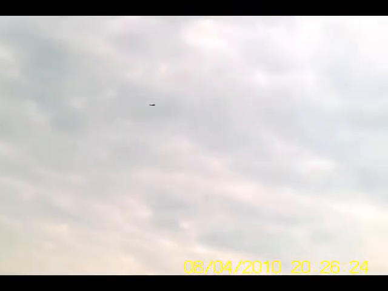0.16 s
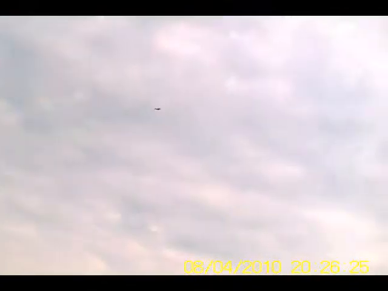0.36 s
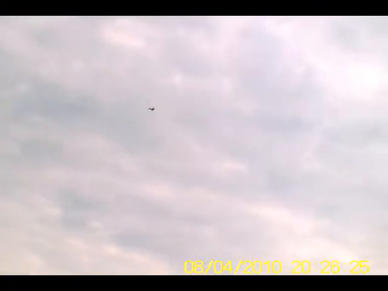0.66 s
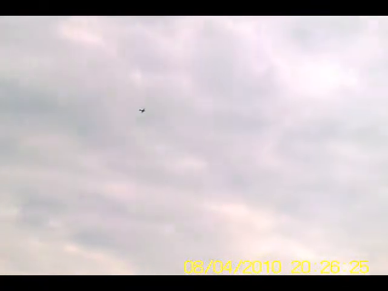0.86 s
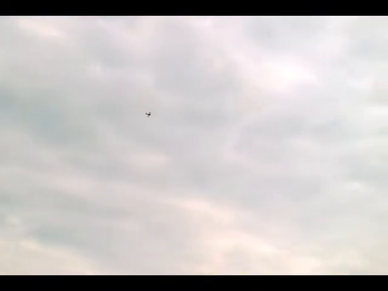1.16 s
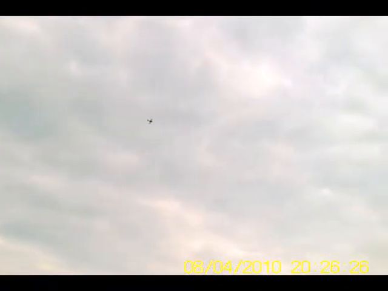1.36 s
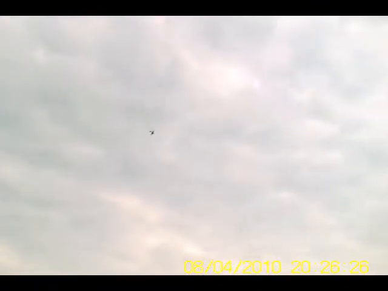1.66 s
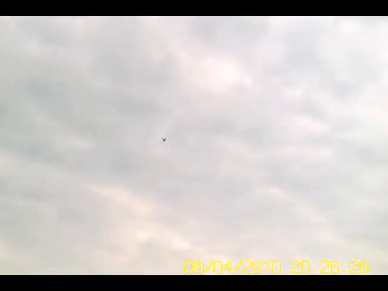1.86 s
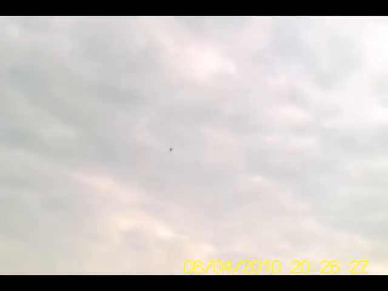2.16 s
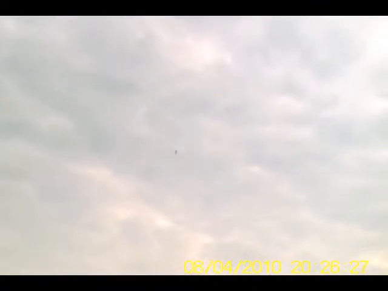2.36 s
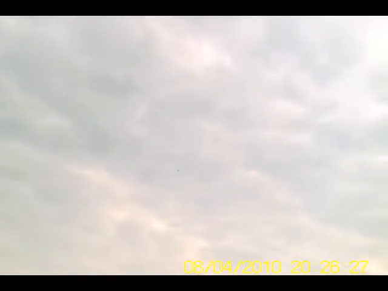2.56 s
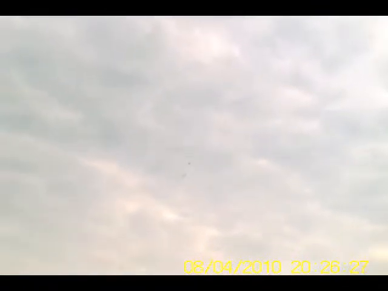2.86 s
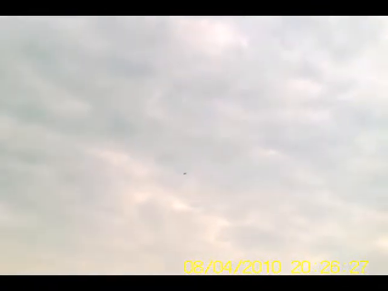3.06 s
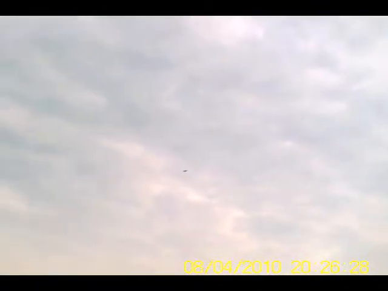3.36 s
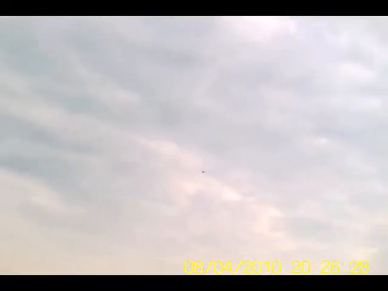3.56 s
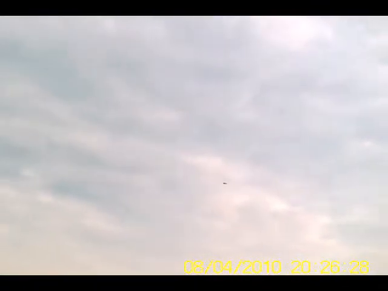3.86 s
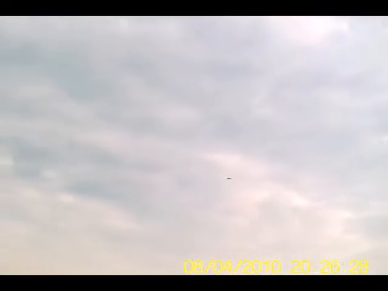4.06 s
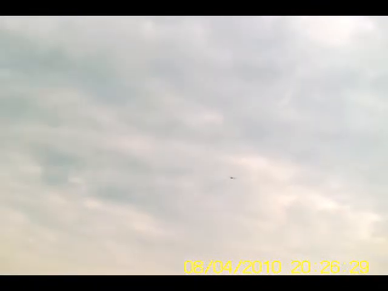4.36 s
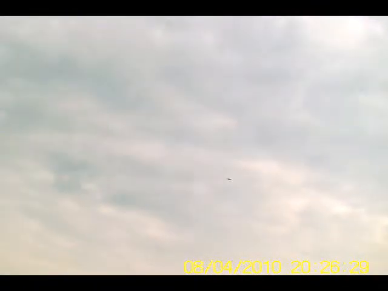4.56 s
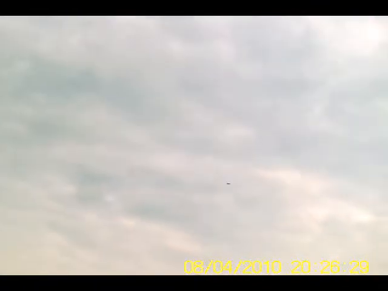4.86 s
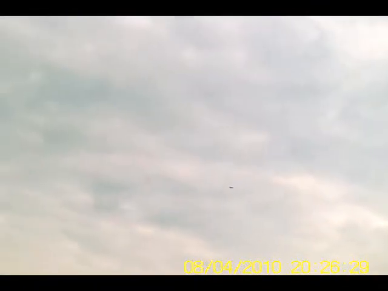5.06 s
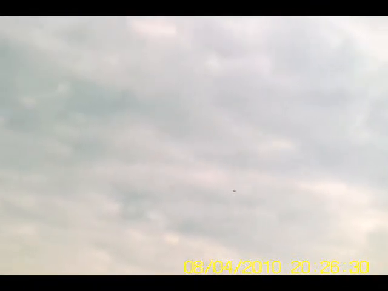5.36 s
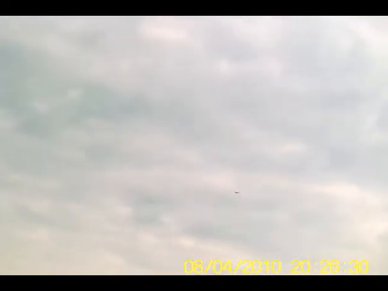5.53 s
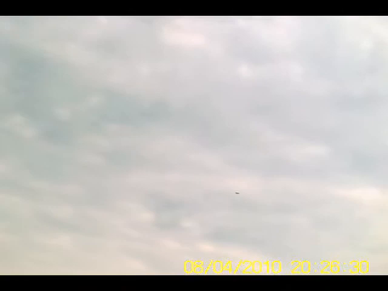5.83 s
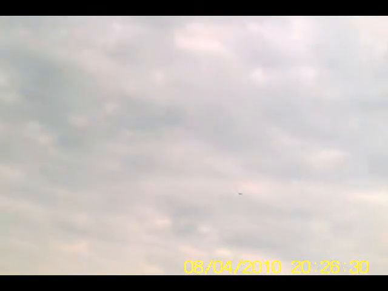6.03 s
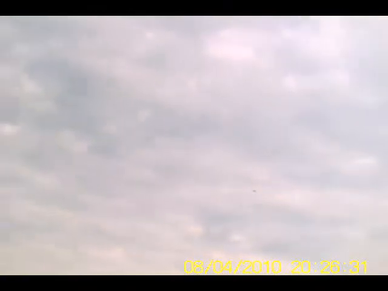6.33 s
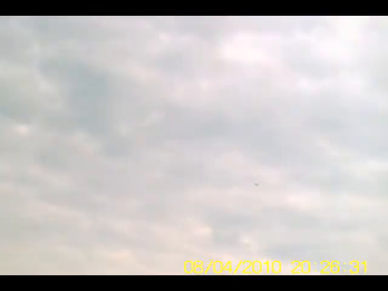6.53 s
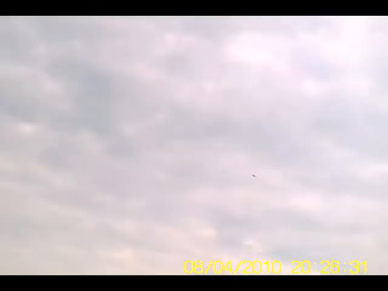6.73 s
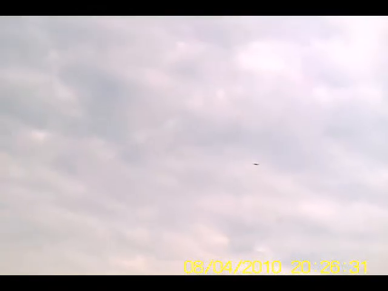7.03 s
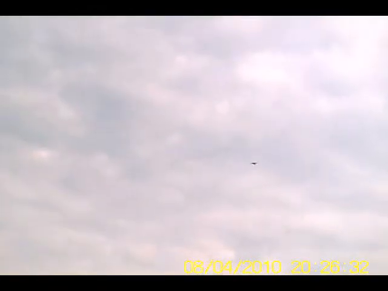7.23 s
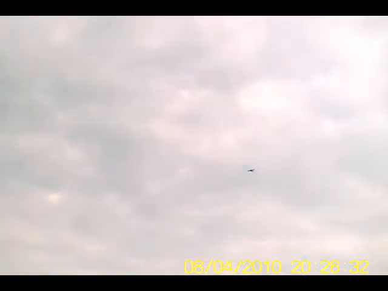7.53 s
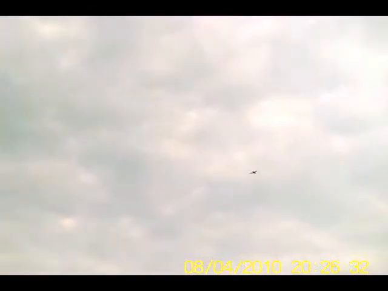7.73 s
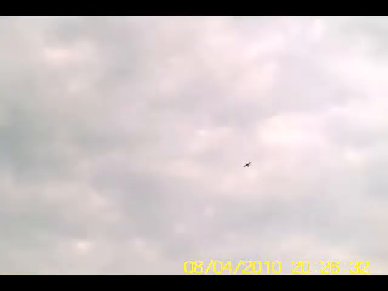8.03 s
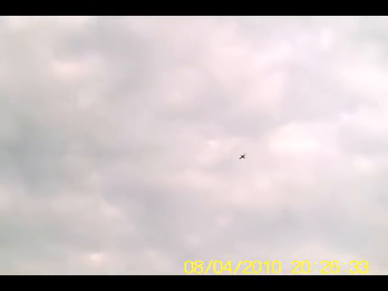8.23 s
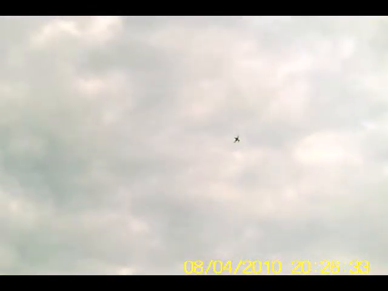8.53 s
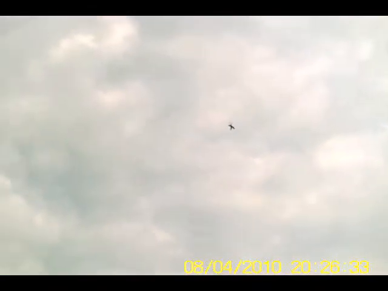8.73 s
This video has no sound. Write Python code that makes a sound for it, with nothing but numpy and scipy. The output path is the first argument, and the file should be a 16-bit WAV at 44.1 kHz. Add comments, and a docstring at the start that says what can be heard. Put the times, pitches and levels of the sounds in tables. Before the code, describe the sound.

Outdoors in a park, heard through a tiny windblown camera microphone. It starts quiet, with a brief low gust, soft far-traffic roar around the middle range, a faint wavering engine drone and a narrow, shrill sizzle high above. Over the first five seconds everything gradually swells. A small electric model plane's thin whine sinks slightly in pitch until about 3 seconds, when it is most noticeable; its low propeller buzz strengthens towards 4.5, then rises in pitch between 5 and 7 as it weakens. Faint chirps and ticks appear, including a softer one near 3.6. At 7 seconds a hard wind push thumps the microphone and the whole scene abruptly drops much quieter. From about 7.5 it climbs again: the higher, steadier propeller buzz returns by 8, with airy wing rush and fluttering, rumbling gusts from 8 to the end at 8.9.

```python
"""A park under a small electric model plane: propeller buzz and motor whine (sines locked to one shaft),
echoed wing rush, far traffic (shaped noise), a far engine's drone, distant chirps and ticks.
Wind rumbles on a tiny camera microphone; its resonance near 5.6 kHz turns air noise into a shrill sizzle.
Camera gain creeps up, swelling all the microphone hears; a hard push of wind near 7 s overloads it
and the gain drops at once, then climbs anew."""
import sys
import numpy as np
from scipy import signal
from scipy.fft import rfft, irfft, next_fast_len
from scipy.io import wavfile
from scipy.ndimage import uniform_filter1d, map_coordinates

SR = 44100
rng = np.random.default_rng(int(sys.argv[2]) if len(sys.argv) > 2 else 0)


def store_wav(level_fs):
    """Save 16-bit WAV to argv[1]."""
    pcm = np.round(np.clip(np.atleast_2d(level_fs), -1, 1) * 32767)
    wavfile.write(sys.argv[1], SR, pcm.T.astype(np.int16))


N = 392137
T = np.arange(N) / SR  # s


def amp(db):
    """Decibels to linear gain."""
    return 10 ** (np.asarray(db) / 20)


def unit(x):
    """Scale x to rms 1."""
    return x / np.sqrt(np.mean(x ** 2) + 1e-20)


def rounded(x):
    """Soft-saturate the highest peaks, at rms 1."""
    return unit(np.tanh(unit(x) / 3))


def curves(rows):
    """Interpolate each column after start_s to one value per sample."""
    start_s, *columns = np.transpose(rows)
    return np.array([np.interp(T, start_s, column) for column in columns])


def bump(centre_s, length_s):
    """Gaussian rise to 1 and fall; length_s is the 1/e half-length."""
    return np.exp(-((T - centre_s) / length_s) ** 2)


def wobble(knots_per_s):
    """Smooth random curve through normally distributed knots."""
    knots = rng.standard_normal(int(N * knots_per_s / SR) + 4)
    return map_coordinates(knots, [T * knots_per_s])


def filtered(x, response):
    """Multiply the spectrum of x by response(Hz)."""
    size = next_fast_len(N + 8192)  # padded against wrap-around
    gain = response(np.fft.rfftfreq(size, 1 / SR))
    return irfft(rfft(x, size) * gain, size)[:N]


def rush(spectrum, patchy_db):
    """Coloured noise of rms 1 whose gain varies in patches of time and frequency."""
    bins = signal.stft(rng.standard_normal(N), nperseg=512)[2]
    field = uniform_filter1d(rng.standard_normal(bins.shape), size=5, axis=0)  # across frequency
    field = uniform_filter1d(field, size=16, axis=1)  # across time
    patchy = bins * amp(patchy_db * unit(field))
    noise = signal.istft(patchy, nperseg=512)[1][:N]
    hz, db = np.transpose(spectrum)
    return unit(filtered(noise, lambda f: amp(np.interp(np.log(f + 1), np.log(hz + 1), db))))


def narrow(centre_hz, half_width_hz):
    """Noise of rms 1 in one resonance-shaped band; half amplitude at half_width_hz."""
    noise = rng.standard_normal(N)
    return unit(filtered(noise, lambda f: 1 / (1 + ((f - centre_hz) / half_width_hz) ** 2)))


# motor and propeller: start_s, shaft_hz, propeller_db, whine_db
FLIGHT = [(0, 267, -71, -59), (2.2, 258, -57, -65), (3, 254.8, -54, -54), (3.6, 257.6, -49.5, -66),
          (4.5, 267.2, -46, -62), (5.3, 273.6, -52.5, -64), (5.7, 307.7, -54, -85),
          (6.8, 324, -62.5, -63.5), (8.1, 324.8, -45, -59.5), (8.89, 316.6, -45, -65)]
WHINE_OCTAVE_DB, TONE_FLICKER_DB = -8.5, 1.5  # octave relative to whine; turbulent fading


def plane():
    """Propeller at shaft rate; seven pole pairs whine at 7 and 14 times it; turbulence flickers each."""
    shaft_hz, propeller_db, whine_db = curves(FLIGHT)
    unsteady_hz = shaft_hz * (1 + 0.00046 * wobble(17))
    angle = 2 * np.pi * np.cumsum(unsteady_hz) / SR
    orders_db = [(1, propeller_db), (7, whine_db), (14, whine_db + WHINE_OCTAVE_DB)]
    return sum(amp(db + TONE_FLICKER_DB * wobble(5.6)) * np.sin(order * angle)
               for order, db in orders_db)


# wing rush and ground echo: start_s, rush_db, echo_lag_s
CIRCUIT = [(0, -67, .0056), (1.5, -70, 0.0036), (4, -71.5, .0033), (6.3, -64, .003), (7.3, -63, 0.0039),
           (8.3, -57, .0046), (8.89, -61, .0053)]


def wings():
    """Wing rush plus delayed ground echo: a comb sweeping up as the lag shrinks, down as it grows."""
    rush_db, echo_lag_s = curves(CIRCUIT)
    air = narrow(3850, 450) + amp(-6.0) * narrow(6540, 330)
    echo = map_coordinates(air, [(T - echo_lag_s) * SR])
    return amp(rush_db) * unit(air + .6 * echo)


# background levels: start_s, traffic_db, air_db
PARK_LEVEL = [(0, -36.5, -41.5), (1.2, -35, -40), (2.2, -36, -40), (3, -37, -42.5), (3.5, -33.8, -43),
              (4.1, -35.5, -43.5), (6.2, -37, -45.5), (7.2, -37.5, -42), (8.2, -36, -38), (8.89, -40, -41)]
# far-traffic spectrum: freq_hz, relative_db
TRAFFIC_SPECTRUM = [(100, -28), (280, -13.5), (450, -7.5), (600, -4.3), (750, -3), (920, 0.5), (1150, -0.2),
                    (1350, -5.5), (1600, -20), (1900, -29.5), (3000, -67)]
# open-air spectrum: freq_hz, relative_db
AIR_SPECTRUM = [(150, -26), (330, -15.5), (450, -9.5), (560, -2), (800, -4.5), (1250, -2), (1550, 1.5),
                (1700, -5.5), (1880, -16), (2050, -20), (2750, -29), (3400, -21), (4400, -29.5),
                (6000, -48)]
# far engine's tones: tone_hz, relative_db
DRONE = [(61.46, 3), (97.2, 0.5), (123.4, -5.5), (387.7, -14), (424.6, -15)]
# far engine's levels either side of the split: start_s, low_tones_db, high_tones_db
DRONE_LEVEL = [(0, -37, -56), (1.5, -39, -44), (2.6, -36.5, -37), (3.8, -36.5, -35.5), (4.2, -43, -40),
               (4.7, -39, -37.5), (6, -42.5, -42), (8.89, -42, -45)]
# hiss band near 2.3 kHz: start_s, level_db
LOW_BAND = [(0, -57), (.9, -55), (2.2, -60.5), (4.6, -58.5), (7, -61), (8.89, -66)]
HIGH_BAND_DB, HIGH_BAND_S, HIGH_BAND_LENGTH_S = -63.5, 4.17, 1.94  # one swell near 3.4 kHz
DRONE_SPLIT_HZ, TRAFFIC_WAVER_DB = 250, .5


def park():
    """Far tyres roar near 1 kHz over an engine's drone, open air and two narrow hiss bands."""
    traffic_db, air_db = curves(PARK_LEVEL)
    low_tones_db, high_tones_db = curves(DRONE_LEVEL)
    low_band_db, = curves(LOW_BAND)
    tyres = amp(traffic_db + TRAFFIC_WAVER_DB * wobble(8)) * rush(TRAFFIC_SPECTRUM, patchy_db=-0.1)
    air = amp(air_db) * rush(AIR_SPECTRUM, patchy_db=0.5)
    drone = 0
    for tone_hz, relative_db in DRONE:
        # the long path through moving air makes each tone fade and drift in phase
        level_db = low_tones_db if tone_hz < DRONE_SPLIT_HZ else high_tones_db
        level = amp(level_db + relative_db + 2.4 * wobble(5.6))
        drone = drone + level * np.sin(2 * np.pi * tone_hz * T + 0.65 * wobble(5))
    low_band = amp(low_band_db) * narrow(2323, 270)
    swell = bump(HIGH_BAND_S, HIGH_BAND_LENGTH_S)
    high_band = amp(HIGH_BAND_DB) * swell * narrow(3356, 100)
    return tyres + air + drone + low_band + high_band


# port resonance: freq_hz, relative_db
SIZZLE_SPECTRUM = [(3000, -47), (4400, -28.5), (4800, -18.5), (5100, -9), (5350, -3), (5580, 0.5),
                   (5780, -3), (6080, -16), (6400, -19), (6850, -21), (7200, -32), (9000, -66)]
# hiss, before and after the gain stage: freq_hz, relative_db
HISS_SPECTRUM = [(500, -7), (2900, 5), (4200, -1.5), (7000, 1), (9600, 0), (10200, -2.5), (10600, -9.5),
                 (11000, -22), (11300, -39)]
SIZZLE_DB, MIC_HISS_DB = -43, -61  # before gain control


def microphone():
    """The port's sharp resonance rings with air noise, above an even hiss."""
    sizzle = amp(SIZZLE_DB + 0.16 * wobble(17)) * rush(SIZZLE_SPECTRUM, patchy_db=0.14)
    return sizzle + amp(MIC_HISS_DB) * rush(HISS_SPECTRUM, patchy_db=1.1)


# gusts and lulls: centre_s, length_s, change_db
GUSTS = [(.2, 0.22, 3.5), (1.5, 0.27, 0.5), (2.6, .4, 1), (4.15, 0.083, -2.5), (4.6, 0.082, 2),
         (5.852, 0.34, -2), (7.35, .2, -6), (8.03, 0.087, 6.5), (8.33, 0.13, 11), (8.54, 0.13, 8),
         (8.85, 0.23, 9)]
# slow heaving of the air: start_s, level_db
SWAY_LEVEL = [(0, -20.5), (1, -31), (4, -30), (6.95, -22), (7.12, -15.5), (8.89, -16)]
# slow-heave spectrum: freq_hz, relative_db
SWAY_SPECTRUM = [(1, -14.5), (4, 0.5), (14, -3.5), (28, -9), (42, -18), (70, -43), (150, -80)]
# large-eddy spectrum: freq_hz, relative_db
RUMBLE_SPECTRUM = [(15, -29.5), (38, -4.5), (58, 1.5), (80, -8), (110, -11), (140, -16.5), (220, -43),
                   (500, -73)]
# small-eddy spectrum: freq_hz, relative_db
FLUTTER_SPECTRUM = [(50, -33), (105, 1.5), (140, 0.5), (185, 0), (240, -7.5), (350, -10), (600, -26.5),
                    (1500, -62)]
RUMBLE_DB, FLUTTER_DB = -30, -42  # between gusts, before gain control
FLUTTER_GUST_RATIO = 1.13  # flutter dB per gust dB
EDDY_DB, FLURRY_DB = 1, 1.2  # flutter's swelling and quick flurries
PUSH_S, PUSH_LENGTH_S, PUSH_DB = 7.008, .03, -8  # hard push, before gain control


def wind():
    """Eddies of three sizes press on the microphone; gusts raise the smallest most; a push displaces all."""
    gust_db = sum(change_db * bump(centre_s, length_s) for centre_s, length_s, change_db in GUSTS)
    sway_db, = curves(SWAY_LEVEL)
    eddies = wobble(16)
    sway = amp(sway_db) * rounded(rush(SWAY_SPECTRUM, patchy_db=1.25))
    large = amp(0.95 * eddies) * rush(RUMBLE_SPECTRUM, patchy_db=0.5)
    rumble = amp(RUMBLE_DB + gust_db) * rounded(large)
    small = amp(EDDY_DB * eddies + FLURRY_DB * wobble(45)) * rush(FLUTTER_SPECTRUM, patchy_db=-0.3)
    flutter = amp(FLUTTER_DB + FLUTTER_GUST_RATIO * gust_db) * unit(small)
    push = bump(PUSH_S, PUSH_LENGTH_S)
    return (sway + rumble + flutter) * (1 - push) + amp(PUSH_DB) * push


# faint chirps and ticks, and one brief swell of the hiss band near 2.3 kHz at 3.58 s: centre_s, centre_hz,
# width_hz, length_s, level_db
CHIRPS = [(.17, 3850, 350, 0.022, -56), (1.53, 3750, 400, .015, -59), (2.457, 3400, 1800, .008, -54),
          (3.581, 2278, 500, 0.16, -53), (4.115, 4225, 450, .039, -64), (7.338, 3000, 1500, .005, -54),
          (8.237, 3500, 1800, 0.0099, -53)]


def chirps():
    """Short, soft-edged bursts of narrow noise: far chirps and ticks, and one brief swell near 2.3 kHz."""
    return sum(amp(level_db) * bump(centre_s, length_s) * narrow(centre_hz, width_hz / 2)
               for centre_s, centre_hz, width_hz, length_s, level_db in CHIRPS)


def scene():
    """Sum of all that reaches the one microphone."""
    return (plane() + wings() + park() + microphone() + wind() + chirps())[None]


START_DB, CUT_DB = -13.5, -17.5  # at the start and after overload; full gain 0 dB; before easing
HOLD_S, CLIMB_DB_PER_S, EASE_DB = 0.54, 3.5, 2.63
OVERLOAD = .29  # share of full scale


def climb(from_db, since_s):
    """Gain since a reset: hold, steady climb, easing into full gain."""
    db = from_db + CLIMB_DB_PER_S * np.maximum(since_s - HOLD_S, 0)
    return amp(-EASE_DB * np.logaddexp(0, -db / EASE_DB))


def gain_control(x):
    """Gain climbs until the smoothed sound first overloads, then drops at once and climbs anew."""
    gain = climb(START_DB, T)
    smoothed = np.abs(uniform_filter1d(x, size=256))
    overload_s = T[smoothed * gain > OVERLOAD]
    if len(overload_s):
        gain = np.where(T < overload_s[0], gain, climb(CUT_DB, T - overload_s[0]))
    return gain * x


# camera electronics: tone_hz, level_db
WHISTLES = [(7400, -87.5), (9600, -88.5)]
LATE_HISS_DB, TOP_HZ = -75, 10950  # hiss after the gain stage; band limit


def record(dry):
    """Camera chain: gain control, added hiss and two thin whistles, steep band limit."""
    whistles = sum(amp(level_db) * np.sin(2 * np.pi * tone_hz * T) for tone_hz, level_db in WHISTLES)
    hiss = amp(LATE_HISS_DB) * rush(HISS_SPECTRUM, patchy_db=2.0)
    mixed = gain_control(dry[0]) + hiss + whistles
    return filtered(mixed, lambda f: 1 / (1 + (f / TOP_HZ) ** 160))[None]


dry = scene()
out = record(dry)
store_wav(out)
```